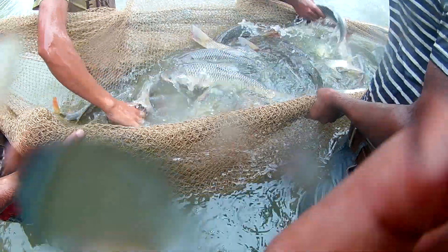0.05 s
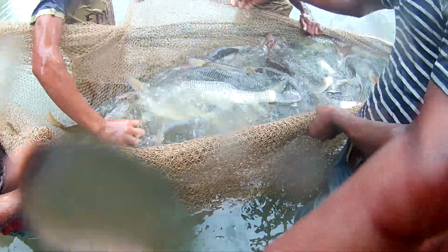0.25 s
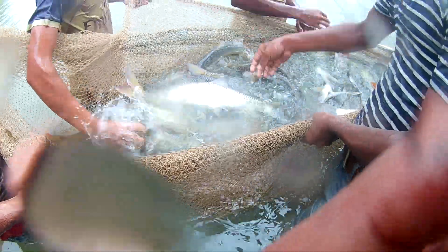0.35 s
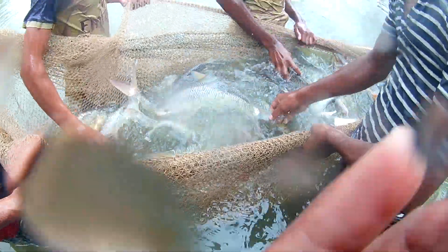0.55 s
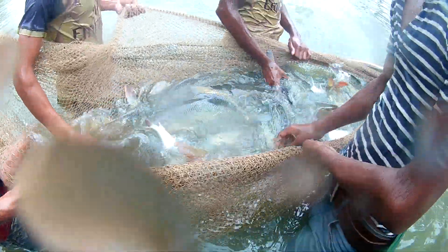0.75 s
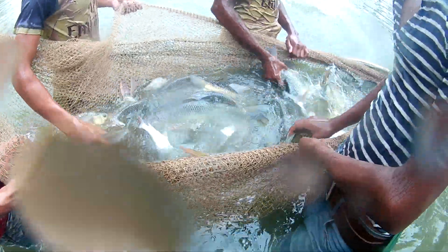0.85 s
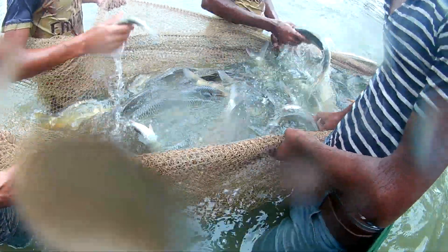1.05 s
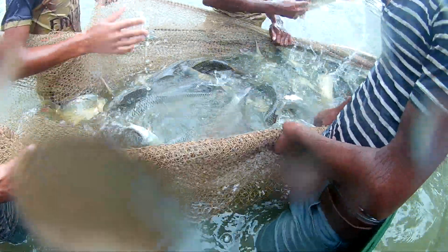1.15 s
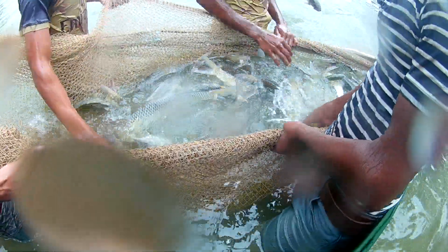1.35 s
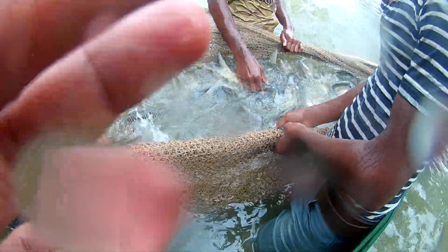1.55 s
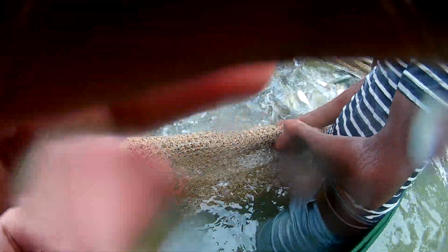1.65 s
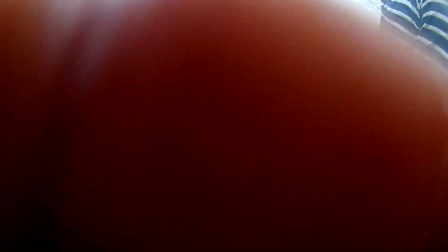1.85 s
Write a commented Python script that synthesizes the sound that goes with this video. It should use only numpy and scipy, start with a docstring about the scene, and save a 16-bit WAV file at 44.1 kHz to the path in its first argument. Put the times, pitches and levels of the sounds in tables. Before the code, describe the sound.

Drops flung by thrashing fish hit a waterproof camera case with hard, hollow knocks, the loudest overloading early on; then quiet muffled splashing, small plops, and a finger rubbing the case at the end.

```python
"""Drops flung by fish thrashing in a net in shallow water, heard from inside a sealed waterproof camera case.
The drops tap the case, ringing its modes, and push on the microphone membrane; the hardest overload it.
The splashing, rising bubbles over noise, arrives muffled through the case, with sway, rumble and a few
short decaying tones. At the end a finger wipes over the case, made of rough filtered noise."""
import sys
import numpy as np
from scipy import signal
from scipy.fft import rfft, irfft
from scipy.io import wavfile
from scipy.ndimage import uniform_filter1d

SR = 44100
rng = np.random.default_rng(int(sys.argv[2]) if len(sys.argv) > 2 else 0)


def generate_wav(sig):
    """Save sig (samples, or channels by samples) to the path in sys.argv[1] as 16-bit PCM at SR."""
    pcm = np.round(np.clip(np.atleast_2d(sig).T, -1, 1) * 32767).astype(np.int16)
    wavfile.write(sys.argv[1], SR, pcm)


def convert_level_to_amplitude(level_db):
    """Map a level in decibels to its linear amplitude factor."""
    exponent = np.asarray(level_db, float) / 20
    return 10 ** exponent


N = 83790  # samples
t = np.arange(N) / SR


def envelope(rows, column=1):
    """Gain over time, straight in dB between the rows of a table that starts with time_s."""
    columns = np.array(rows).T
    return convert_level_to_amplitude(np.interp(t, columns[0], columns[column]))


def colour(x, points):
    """Filter x by (freq_hz, relative_db) points, joined on a log frequency axis, and scale it to rms 1."""
    hz, db = np.array(points, float).T
    freq_hz = np.fft.rfftfreq(N, 1 / SR)
    gain_db = np.interp(np.log(freq_hz + 1), np.log(hz), db, left=-80, right=-80)
    shaped = irfft(rfft(x) * convert_level_to_amplitude(gain_db), N)
    return shaped / np.std(shaped)


def random_walk(rate_hz):
    """Random steps at rate_hz, smoothed twice into a slow drift of spread 1."""
    hold = int(SR / rate_hz)
    steps = np.repeat(rng.standard_normal(N // hold + 1), hold)
    smooth = uniform_filter1d(uniform_filter1d(steps, hold), hold)[:N]
    return smooth / np.std(smooth)


def add_ring(out, start_s, hz, level_db, t60_s, onset_ms):
    """Add a damped resonance: a sine with a soft onset and an exponential decay."""
    first = int(start_s * SR)
    age_s = np.arange(min(int(1.3 * t60_s * SR), N - first)) / SR
    decay = np.exp(-np.log(1000) * age_s / t60_s)
    onset = 1 - np.exp(-(age_s * 1000 / onset_ms) ** 2)
    out[first:first + len(age_s)] += convert_level_to_amplitude(level_db) * np.sin(2 * np.pi * hz * age_s) * decay * onset


def splashing():
    """Short bubbles of uneven size, each rising slightly in pitch, over spray noise, dulled by the case."""
    # muffled splashing: time_s [s], level_db [dB]
    splash_levels = [(0, -59.5), (.1, -57), (.45, -59.5), (.62, -63.5), (.75, -60.5), (.9, -62.5),
                     (1.15, -64), (1.3, -61), (1.5, -62.5), (1.9, -58)]
    # colour through the case: freq_hz [Hz], relative_db [dB per Hz]
    splash_colour = [(250, -29), (400, -8), (750, -10), (1300, -2.5), (1800, -4.5), (2400, -7.5),
                     (3100, -9), (3380, -4.5), (3800, -15.5), (4600, -15.5), (6000, -22), (9000, -32.5),
                     (12000, -63)]
    bubbles_per_s, cycles, spread_db, bubbles_over_spray_db = 900, 15, 2.4, -4
    chance = rng.random((4000, 3))
    bubbles = np.zeros(N + SR)
    start_s = np.cumsum(-np.log(1 - chance[:, 0]) / bubbles_per_s)
    for s, size, strength in zip(start_s[start_s < N / SR], chance[:, 1], chance[:, 2]):
        hz = 350 * 2 ** (4.4 * size)
        # age in units of 15 starting periods, so high bubbles die sooner
        age = np.arange(int(3.5 * cycles * SR / hz)) * hz / SR / cycles
        tone = np.sin(2 * np.pi * cycles * (age + 0.0047 * age * age))
        gain = convert_level_to_amplitude(-spread_db * np.log(1 - .97 * strength)) * np.sqrt(hz)
        first = int(s * SR)
        bubbles[first:first + len(age)] += gain * np.exp(-1.6 * age) * tone
    spray = rng.standard_normal(N)
    mix = bubbles[:N] / np.std(bubbles) * convert_level_to_amplitude(bubbles_over_spray_db) + spray
    unsteady = mix * convert_level_to_amplitude(2.2 * random_walk(25))
    return colour(unsteady, splash_colour) * envelope(splash_levels)


def slosh():
    """The case sways slowly, a very low noise; water rumbles against it, a higher, unsteady noise."""
    # sloshing against the case: time_s [s], sway_db [dB], rumble_db [dB]
    slosh_levels = [(0, -48.5, -49.5), (.18, -42.5, -59), (.3, -41, -65), (.45, -36.5, -57.5),
                    (.6, -50.5, -60.5), (.75, -61, -64.5), (1.3, -58.5, -62.5), (1.6, -62, -63),
                    (1.75, -52, -70.5), (1.9, -55, -44)]
    # colours of sway and rumble: freq_hz [Hz], relative_db [dB per Hz]
    sway_colour = [(8, -32), (22, 2.5), (40, -6.5), (70, -19.5), (120, -49.5)]
    rumble_colour = [(40, -31), (65, 1.5), (200, -6.5), (400, -12), (650, -39.5)]
    sway = colour(rng.standard_normal(N), sway_colour) * envelope(slosh_levels)
    unsteady = rng.standard_normal(N) * convert_level_to_amplitude(2.5 * random_walk(25))
    rumble = colour(unsteady, rumble_colour) * envelope(slosh_levels, column=2)
    return sway + rumble


def pushes():
    """Pressure swells to a round tip and relaxes, softened by the membrane; it shakes two long case modes."""
    # water or finger pressing the membrane: peak_s [s], level_db [dB, before the membrane],
    # direction [+1 in, -1 out], rise_ms [ms], fall_ms [ms]
    push_table = [(0.0284, -19.5, 1, .4, .1), (0.1209, -13, 1, 0.23, 2.2), (0.13, -31, -1, 0.18, 1.2),
                  (0.2303, 7.5, -1, 0.44, 0.035), (0.2306, -2.5, 1, 0.032, 2.73),
                  (0.4186, 3.5, 1, 0.77, 0.26), (0.4198, -4, -1, 0.33, 3.3), (.4330, -19, 1, 2.6, 5),
                  (0.4408, -9, 1, 2.3, 2.7), (0.4654, -14, -1, 0.42, 1.7), (0.524, -23.5, -1, 0.43, 0.76),
                  (0.596, -41.5, 1, 0.59, 1.5), (1.658, -29, 1, 1.8, 2.2), (1.666, -28, -1, 2.2, 6.4),
                  (1.677, -30.5, 1, 3.2, 5.1), (1.864, -33.5, 1, 1.8, 0.43), (1.866, -26, -1, 0.27, 1.4),
                  (1.879, -34.5, 1, 1.6, 0.91), (1.896, -31, -1, 1.5, 0.73)]
    # two case modes that ring long: pitch_hz [Hz], # coupling_db [dB, before the drive gain], t60_s [s]
    long_modes = [(441, -83.5, 1.3), (668, -80, .75)]
    membrane_hz, drive_gain = 3500, 20
    pressure = np.zeros(N)
    for peak_s, level_db, direction, rise_ms, fall_ms in push_table:
        from_peak_ms = (t - peak_s) * 1000
        slope_ms = np.where(from_peak_ms < 0, rise_ms, fall_ms)
        swell = np.exp(1 - np.hypot(1, from_peak_ms / slope_ms))
        pressure += np.sign(direction) * convert_level_to_amplitude(level_db) * swell
    membrane = signal.sosfilt(signal.butter(2, membrane_hz, fs=SR, output="sos"), pressure)
    shake = np.gradient(membrane)
    out = membrane.copy()
    for hz, coupling_db, t60_s in long_modes:
        # one complex pole: a ringing resonator
        pole = np.exp((2j * np.pi * hz - np.log(1000) / t60_s) / SR)
        out += convert_level_to_amplitude(coupling_db) * signal.lfilter([1], [1, -pole], shake).imag * drive_gain
    return out


def taps():
    """Each drop cracks briefly and rings the case modes, both strongest near its colour."""
    # drops tapping the case: start_s [s], level_db [dB, before mode and crack gains],
    # centre_hz [Hz, colour centre], ring_factor [times the decay lengths]
    tap_table = [(.0285, -9, 1270, 0.99), (.0575, -45.5, 1200, 1.8), (.1025, -31.5, 1370, 1.02),
                 (.1203, -25, 1010, 0.73), (.1205, -35, 4500, 0.63), (.1308, -23, 2500, 0.2),
                 (.2304, 1.5, 1240, 0.76), (.2505, -37, 4370, 1.7), (.2550, -42.5, 4440, .6),
                 (.390, -54, 1350, 0.66), (.4183, -14.5, 5750, 0.76), (.4194, -7, 810, 0.78),
                 (.4260, -37.5, 5500, 0.9), (.4350, -42, 4000, 0.37), (.4378, -29.5, 2500, 1.5),
                 (.4555, -36, 3855, 2.1), (.4605, -34, 4800, 0.75), (0.4624, -17, 1680, 0.64),
                 (.523, -25, 820, 1.28), (.735, -50.5, 3500, 0.91), (.789, -44.5, 2200, 1.2),
                 (1.029, -46, 2490, 1.8), (1.342, -46.5, 2002, 1.33), (1.3655, -41.5, 2290, 2.4),
                 (1.468, -47.5, 3244, 1.84), (1.489, -43.5, 2200, 1.17), (1.643, -35.5, 800, 0.62),
                 (1.652, -33.5, 1370, 0.73)]
    # case modes: pitch_hz [Hz, before scatter], mode_db [dB, before colour and scatter],
    # t60_s [s, before the drop's ring_factor]
    case_modes = [(629, -6, 0.024), (802, -3, 0.018), (1080, -10.5, 0.017), (1370, -0.5, 0.014),
                  (1802, -2.5, 0.018), (2127, -7.5, 0.016), (2660, -15.5, 0.005), (3306, -12.5, .011),
                  (4530, -16.5, .008), (5676, -16.5, 0.012)]
    colour_oct, onset_ms, scatter_db, pitch_scatter = 1.016, 0.38, 1.8, .02
    crack_db, crack_ms, crack_floor_db, crack_top_hz = -8, 1.6, -33.5, 6900
    out = np.zeros(N)
    chance = rng.standard_normal((len(tap_table), 2, len(case_modes)))
    noise = rng.standard_normal((len(tap_table), 1024))
    age_ms = np.arange(1024) * 1000 / SR
    freq_hz = np.fft.rfftfreq(1024, 1 / SR) + 1

    def off_centre_db(hz, centre_hz):
        """Loss away from the drop's colour: 6 dB at colour_oct octaves, growing with the square."""
        return -6 * (np.log2(hz / centre_hz) / colour_oct) ** 2

    for (s, level_db, centre_hz, ring_factor), scatter, burst in zip(tap_table, chance, noise):
        for (hz, mode_db, t60_s), detune, uneven in zip(case_modes, *scatter):
            colour_db = max(off_centre_db(hz, centre_hz), -22)
            ring_db = level_db + mode_db + colour_db + scatter_db * uneven
            add_ring(out, s, hz * (1 + pitch_scatter * detune), ring_db, t60_s * ring_factor, onset_ms)
        crack_gain = convert_level_to_amplitude(np.maximum(off_centre_db(freq_hz, centre_hz), crack_floor_db))
        crack = irfft(rfft(burst) * crack_gain / (1 + (freq_hz / crack_top_hz) ** 6))
        shape = np.exp(-age_ms / (crack_ms * ring_factor)) * (1 - np.exp(-age_ms / onset_ms))
        first = int(s * SR)
        out[first:first + len(crack)] += convert_level_to_amplitude(level_db + crack_db) * crack / np.std(crack) * shape
    return out


def plops():
    """Short decaying tones that stand out, some alone, three together as the ring of one small splash."""
    # standout tones: start_s [s], level_db [dB, before onset and decay], pitch_hz [Hz], t60_s [s]
    plop_table = [(0.28, -42, 1020, 0.062), (.315, -50.5, 962, .07), (0.684, -43, 1300, 0.027),
                  (0.699, -45.5, 1370, 0.051), (0.754, -40.5, 1400, 0.03), (0.809, -47.5, 1629, 0.032),
                  (1.210, -55.5, 1200, .05), (1.368, -39.5, 1544, 0.025), (1.367, -39, 1900, 0.023),
                  (1.367, -35.5, 3362, 0.018), (1.663, -43.5, 1690, 0.037)]
    out = np.zeros(N)
    for start_s, level_db, hz, t60_s in plop_table:
        add_ring(out, start_s, hz, level_db, t60_s, onset_ms=1.2)
    return out


def wipe():
    """Wet skin rubs unevenly on the case: filtered noise whose level flutters."""
    # finger wiping: time_s [s], level_db [dB]
    wipe_levels = [(1.60, -73.5), (1.65, -51.5), (1.69, -64), (1.78, -68), (1.81, -54.5), (1.86, -40.5),
                   (1.9, -46)]
    # colour of the rubbing: freq_hz [Hz], relative_db [dB per Hz]
    wipe_colour = [(60, -30), (140, 0), (350, -8), (780, -20), (1350, -13), (2050, -16.5), (2500, -24),
                   (5800, -30.5), (9000, -58)]
    roughness_db = 3
    rubbing = rng.standard_normal(N) * convert_level_to_amplitude(roughness_db * random_walk(120))
    return colour(rubbing, wipe_colour) * envelope(wipe_levels)


def scene():
    """All sources summed at the microphone, in mono."""
    mix = splashing() + slosh() + pushes() + taps() + plops() + wipe()
    return mix[None]


def band_limit(x):
    """A steep low-pass at the top of the band."""
    return signal.sosfilt(signal.butter(12, 16660, fs=SR, output="sos"), x)


def record(dry):
    """The capsule leaks slow pressure, overloads and hisses; the coupling sags the flat tops."""
    # capsule hiss: freq_hz [Hz], relative_db [dB per Hz]
    hiss_colour = [(2940, -36), (5000, -8), (8620, -10.5), (15100, -8), (16000, -9), (16500, -28.5)]
    leak_hz, leak_q, coupling_hz = 12, .5, 7
    overload_db, knee, hiss_db = 0.6, 9, -80.5  # a higher knee bends later and harder
    w = 2 * np.pi * leak_hz
    leak = signal.bilinear([1, 0, 0], [1, w / leak_q, w * w], SR)
    driven = signal.lfilter(*leak, dry) / convert_level_to_amplitude(overload_db)
    limited = convert_level_to_amplitude(overload_db) * driven / (1 + np.abs(driven) ** knee) ** (1 / knee)
    coupled = signal.lfilter(*signal.butter(1, coupling_hz, "high", fs=SR), limited)
    hiss = convert_level_to_amplitude(hiss_db) * colour(rng.standard_normal(N), hiss_colour)
    return band_limit(coupled + hiss)


dry = scene()
out = record(dry)
generate_wav(out)
```